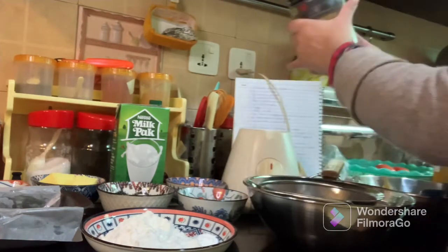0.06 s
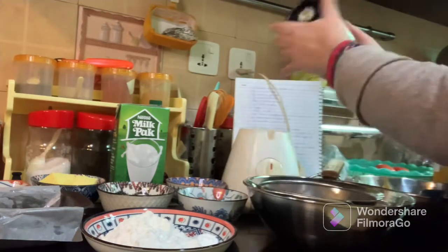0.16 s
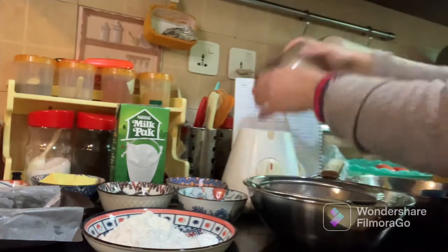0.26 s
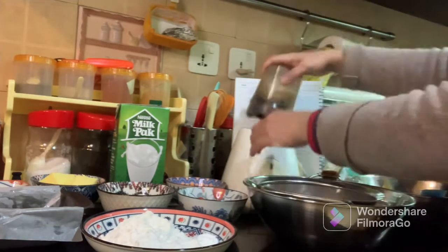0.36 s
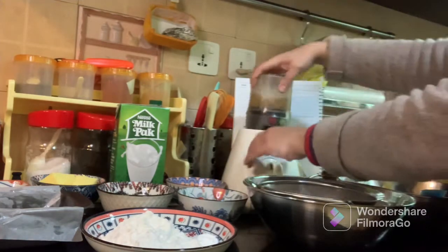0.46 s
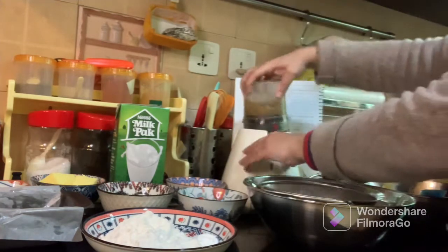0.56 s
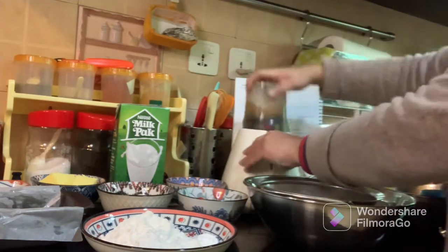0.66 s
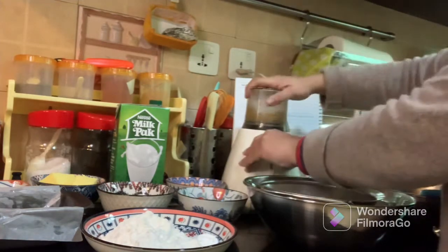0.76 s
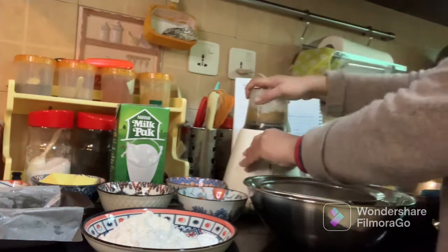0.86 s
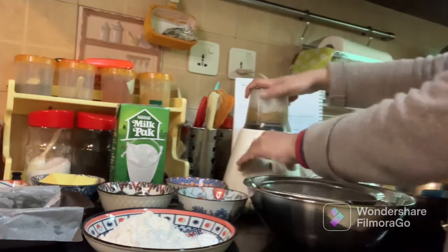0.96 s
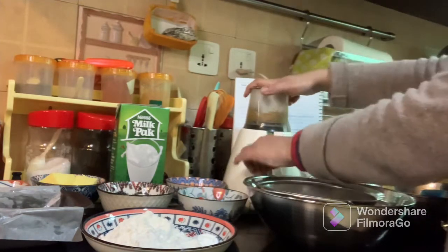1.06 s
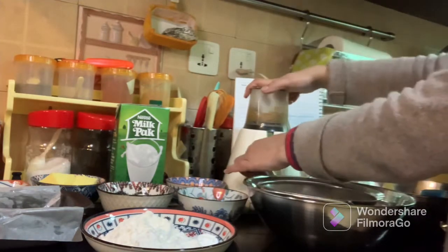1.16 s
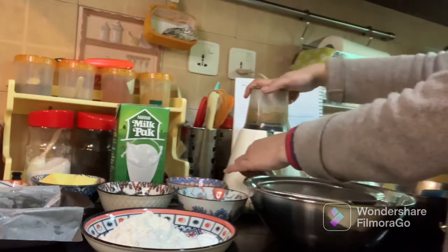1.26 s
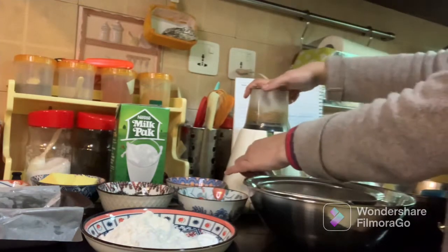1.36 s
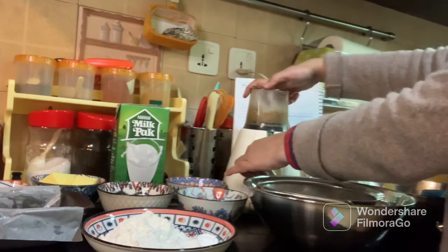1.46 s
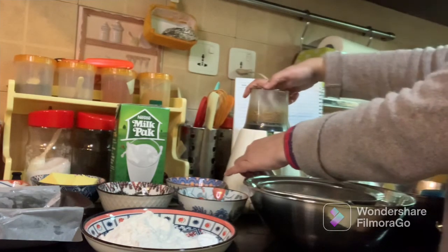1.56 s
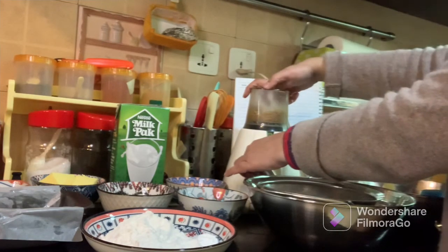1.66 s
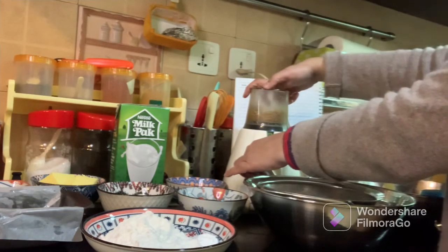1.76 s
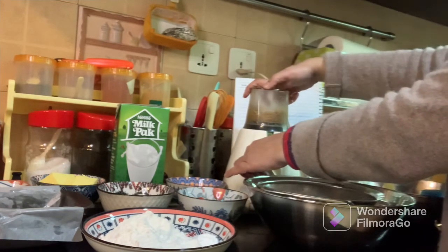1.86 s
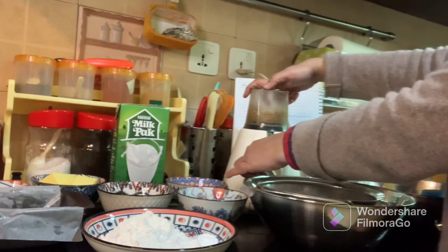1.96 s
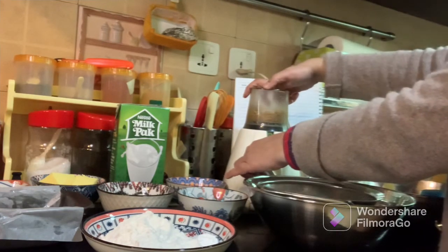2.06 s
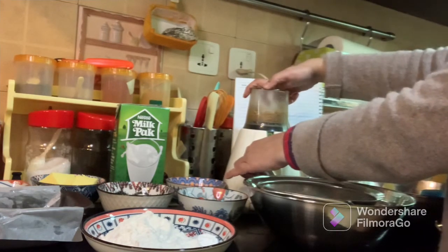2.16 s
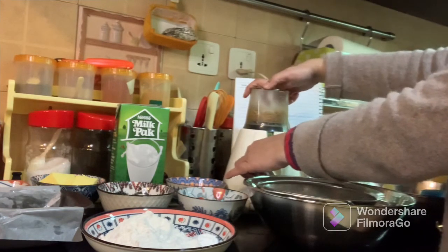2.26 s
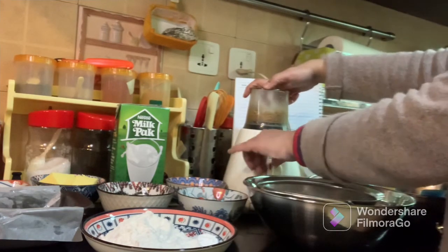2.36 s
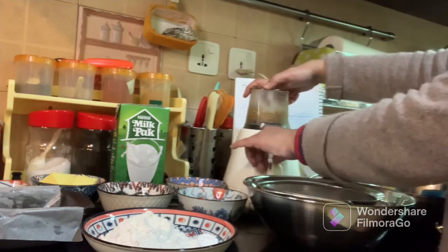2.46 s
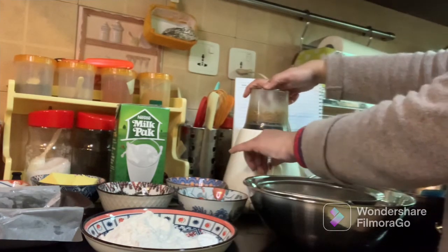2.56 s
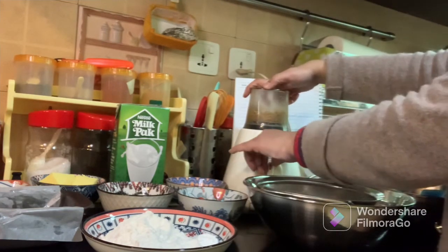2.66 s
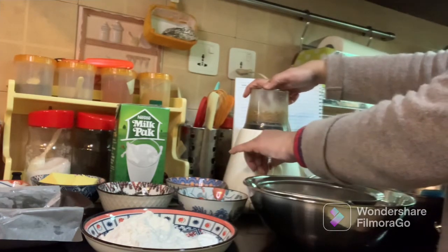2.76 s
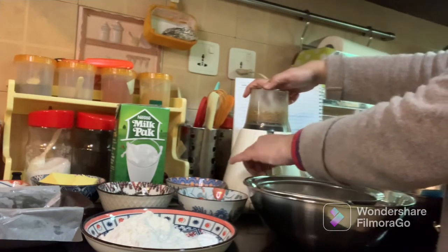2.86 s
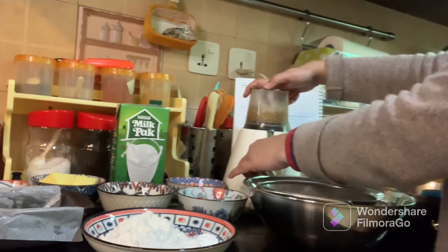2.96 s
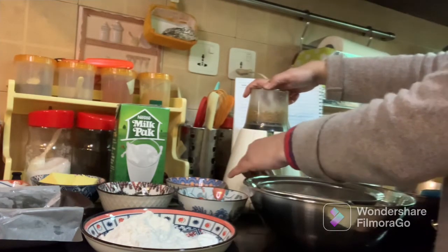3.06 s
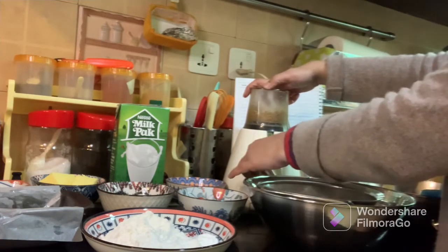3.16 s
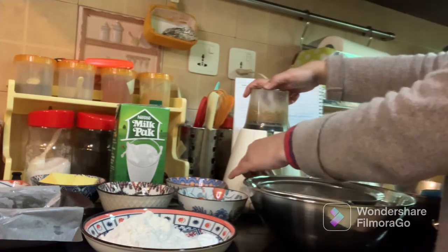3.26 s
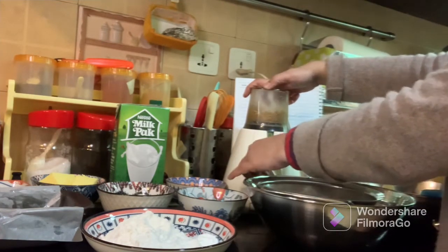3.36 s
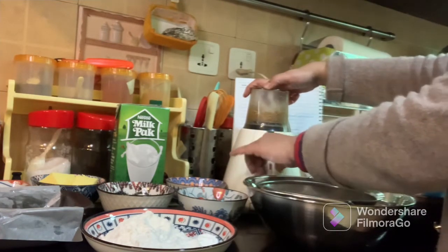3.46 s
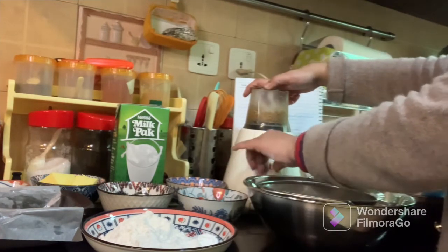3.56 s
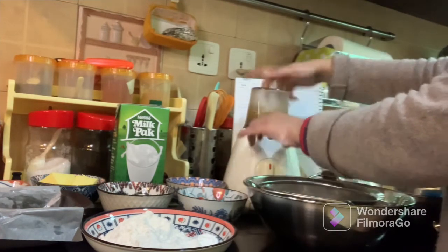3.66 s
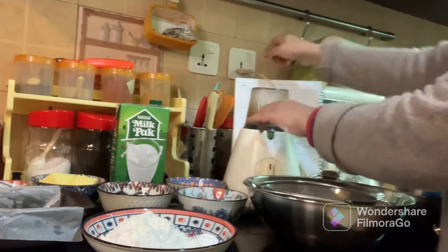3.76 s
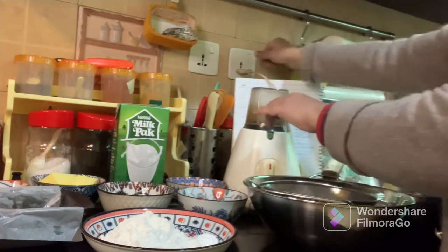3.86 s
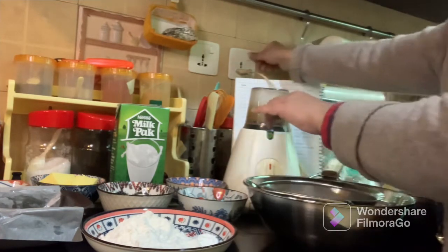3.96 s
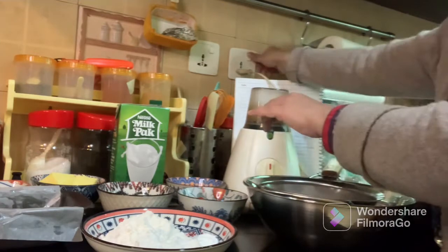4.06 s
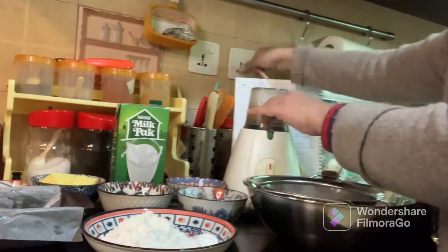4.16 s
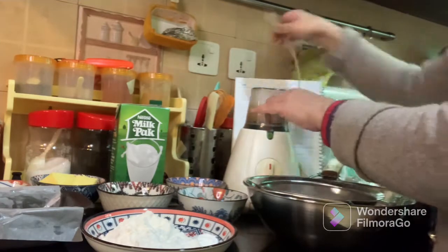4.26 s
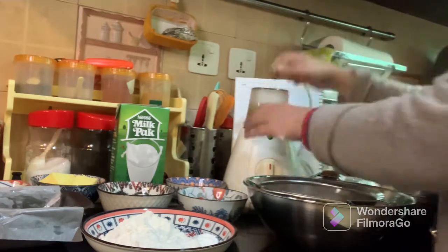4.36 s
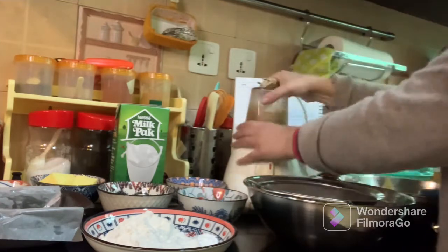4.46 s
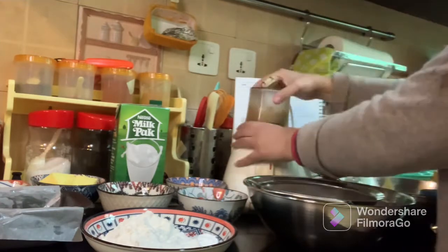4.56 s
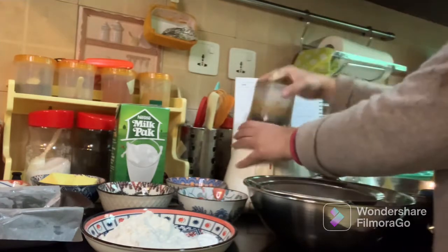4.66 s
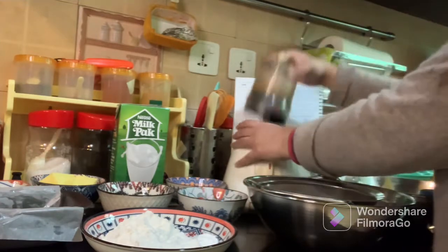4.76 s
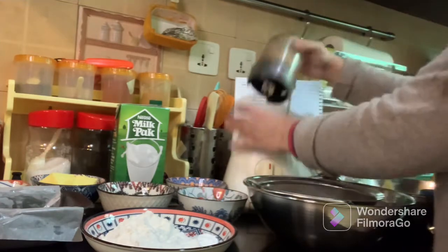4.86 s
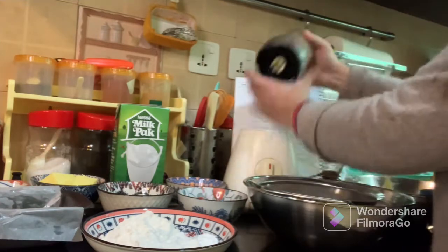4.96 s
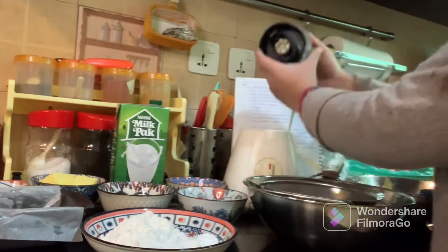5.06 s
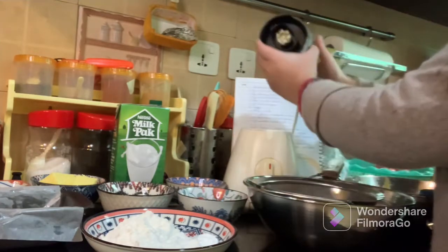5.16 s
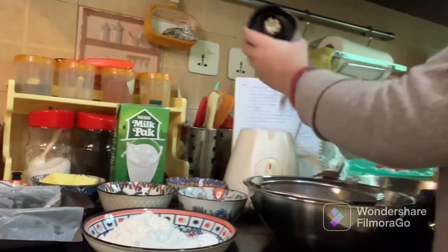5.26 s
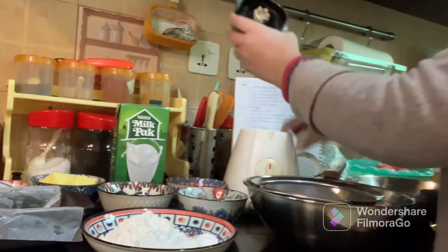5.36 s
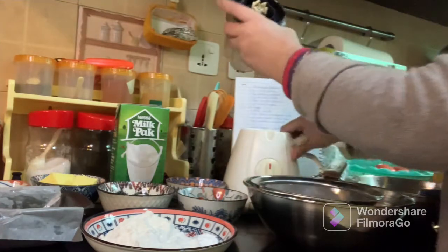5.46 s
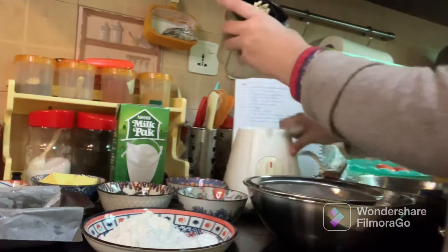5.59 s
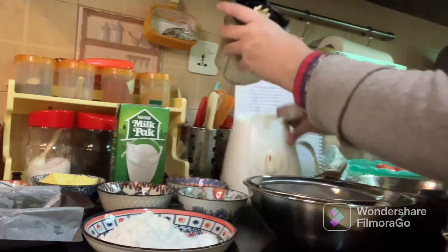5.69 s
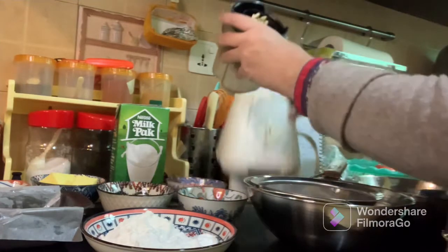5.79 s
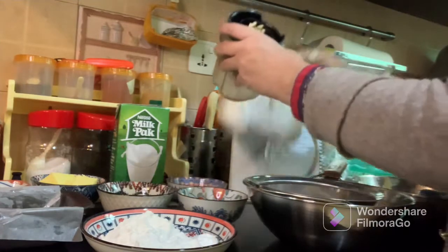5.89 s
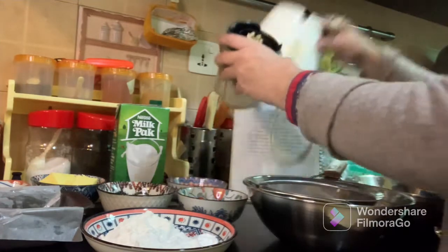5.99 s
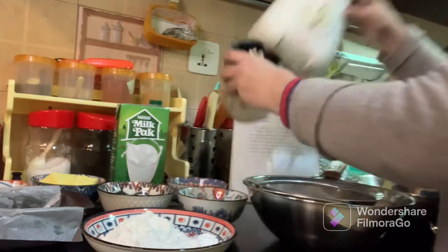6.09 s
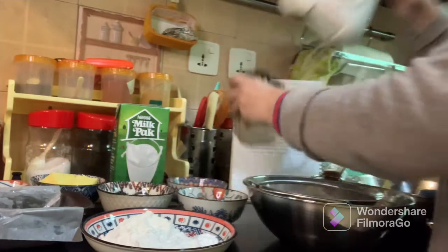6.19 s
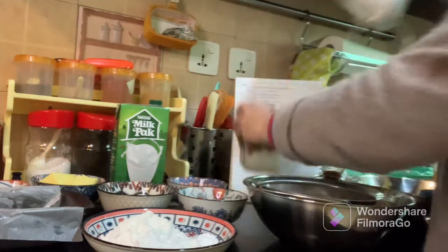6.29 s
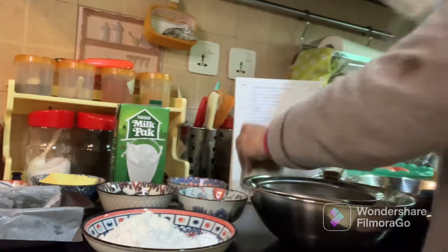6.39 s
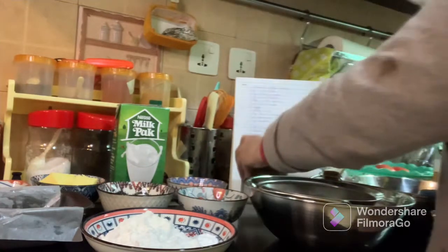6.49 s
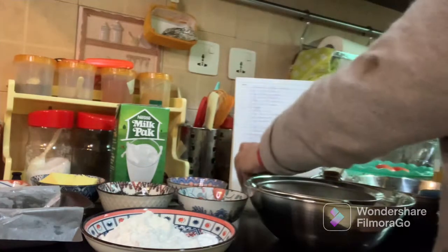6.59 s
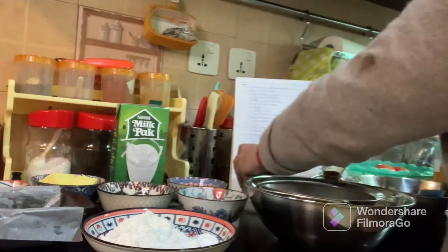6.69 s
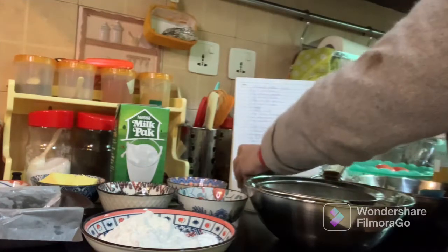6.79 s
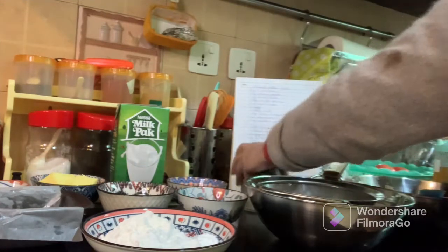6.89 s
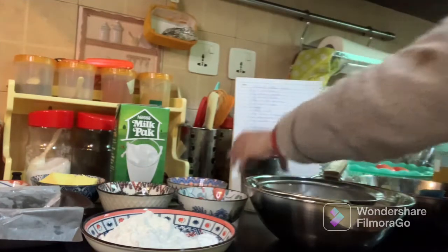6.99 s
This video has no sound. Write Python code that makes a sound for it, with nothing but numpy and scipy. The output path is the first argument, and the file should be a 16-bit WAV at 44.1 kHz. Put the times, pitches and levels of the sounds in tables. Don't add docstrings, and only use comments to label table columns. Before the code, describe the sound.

In a tiled kitchen, plastic is knocked into place, a nut grinder whirs twice and winds down, then clicks, clatter and a hard bang follow.

```python
import sys
import numpy as np
from scipy import signal
from scipy.fft import rfft, irfft, next_fast_len
from scipy.io import wavfile
from scipy.ndimage import uniform_filter1d

SR = 44100
rng = np.random.default_rng(int(sys.argv[2]) if len(sys.argv) > 2 else 0)


def elevation(decibels):
    levels = np.asarray(decibels, float)
    return 10 ** (levels / 20)


def to_wav(s):
    ch = np.atleast_2d(s).T
    pcm = np.round(np.clip(ch, -1, 1) * 32767)
    wavfile.write(sys.argv[1], SR, pcm.astype(np.int16))


N = 310002
TIME = np.arange(N) / SR
CUT_S = 4.68


def colour(x, table):
    hz, db = np.transpose(table)
    f = np.log(np.fft.rfftfreq(x.shape[-1], 1 / SR) + 1)
    y = irfft(rfft(x) * elevation(np.interp(f, np.log(hz), db, left=-90, right=-90)), x.shape[-1])
    return y / np.sqrt(np.mean(y ** 2))


def curves(rows):
    s, *columns = np.transpose(rows)
    return [np.interp(TIME, s, c) for c in columns]


def walk(rate):
    k = int(SR / rate)
    held = np.repeat(rng.standard_normal(N // k + 1), k)
    return 1.27 * uniform_filter1d(held, k)[:N]


def bumps(rows):
    return sum(size * np.exp(-((TIME - s) / np.where(TIME < s, length[0], length[-1])) ** 2)
               for s, size, *length in rows)


def pair(likeness, size=N):
    mid, side = rng.standard_normal((2, size))
    c = np.clip(likeness, 0, 1)
    return (np.sqrt(1 + c) * mid + np.sqrt(1 - c) * side * np.array([[1], [-1]])) / np.sqrt(2)


def ring(modes, t):
    turn = rng.standard_normal((len(modes), 2))
    return sum(elevation(db - 60 * t / max(t60, .005)) * np.sin(2 * np.pi * hz * t + 0.69 * p[:, None])
               for (hz, db, t60), p in zip(modes, turn))


def add(out, s, piece, db):
    i = max(int(s * SR), 0)
    piece = piece[:, i - int(s * SR):]
    out[:, i:i + piece.shape[1]] += (elevation(db) * piece / np.abs(piece).max())[:, :N - i]


def lag_left(x, lag_s):
    turn = np.exp(-2j * np.pi * np.fft.rfftfreq(N, 1 / SR) * lag_s)
    return np.array([irfft(rfft(x[0]) * turn, N), x[1]])


def room(x, t60, wet_db, treble_db):
    t = np.arange(SR // 2) / SR
    noise = pair(0.017, size=SR // 2)
    dull = signal.lfilter(*signal.butter(1, 2500, fs=SR), noise)
    tail = dull * elevation(-60 * t / t60) + (noise - dull) * elevation(treble_db - 60 * t / (0.63 * t60))
    tail = tail * (1 - np.exp(-t / 0.0045)) / np.sqrt(SR * t60 / 40)
    wet = x + elevation(wet_db) * signal.fftconvolve(x.mean(0, keepdims=True), tail, axes=1)[:, :N]
    return signal.lfilter(*signal.butter(2, 140., "high", fs=SR), wet)


# frequency in Hz, level in dB per Hz.
HUM = [(15, -58), (25, -12.5), (75, 0), (177, -6), (211, -3.5), (233, -12.5), (500, -20.5), (700, -70)]
# frequency in Hz, level in dB per Hz.
RUSTLE = [(150, -63.5), (250, -16.5), (355, -10.5), (430, -18.5), (1170, -21), (2320, -24), (6180, -32.5),
          (16000, -56)]
# time in s, rustle in dB, top octave in dB, hum gain in dB, length in s.
SWISHES = [(0, -67, -90, 0.5, 0.096), (0.497, -68, -93, 6, 0.064), (0.811, -45, -87, 0, 0.047),
           (0.978, -53.5, -84, 2, 0.089), (3.084, -51, -58, -2, 0.077), (4.42, -60.5, -69, -0.5, 0.13),
           (4.621, -44.5, -72, 3, 0.047), (4.81, -49.5, -60, -1.5, 0.15), (5.07, -62.5, -65, 2, 0.075),
           (5.495, -56, -77, -2, 0.2), (5.938, -46.5, -56.5, 5.5, 0.13), (6.28, -59, -70, -3, 0.13),
           (6.751, -39, -62, 1.5, 0.084), (6.91, -60.5, -72, 1, 0.087)]


def kitchen():
    later = (TIME > CUT_S).astype(int)
    s, rustle_db, fizz_db, hum_db, length = np.transpose(SWISHES)
    rustle = elevation(np.array((-73.5, -64.5))[later]) + bumps(zip(s, elevation(rustle_db), length))
    top = elevation(np.array((-108, -96))[later]) + bumps(zip(s, elevation(fizz_db), length))
    tone_db = np.array((-65, -56))[later] + bumps(zip(s, hum_db, length))
    hum = colour(pair(0.68), HUM) * elevation(tone_db + 2.7 * walk(7.8))
    fizz = colour(pair(0.55), [(10000, -36), (10800, -6.5), (15800, -2)]) * top * elevation(-7.5)
    return hum + fizz + colour(pair(0.039), RUSTLE) * rustle * elevation(0.57 * walk(24))


# time in s, peak in dB.
THUDS = [(0.453, -60), (0.486, -36.5), (0.629, -44), (0.765, -24.5), (.798, -27), (.92, -41.5),
         (4.468, -44), (4.64, -45), (4.76, -37.5), (4.80, -25.5), (4.836, -30), (4.886, -38), (5.495, -39),
         (5.531, -37), (5.58, -43)]
# mode in Hz, level in dB, 60 dB decay in s.
COUNTER_MODES = [(318, 0, .22), (290, -2, .14), (355, -6, .09), (245, -4, .08), (175, -6, .08)]


def thuds():
    out, t = np.zeros((2, N)), np.arange(SR // 4) / SR
    for s, db in THUDS:
        add(out, s, ring(COUNTER_MODES, t) * (1 - np.exp(-(t / 0.0054) ** 2)), db)
    return out


# frequency in Hz, level in dB per Hz.
PLASTIC = [(100, 10.5), (400, 3), (1000, 6), (2500, -4), (5000, -17), (16000, -30.5)]
# frequency in Hz, level in dB per Hz.
CRACK = [(1500, -2), (3500, 6.5), (6500, -3.5), (10000, -7.5), (15500, -9.5), (16500, -26)]


def knocks(table, rise):
    out, t = np.zeros((2, N)), np.arange(2 ** 13) / SR
    for s, db, hz, crack_db, contact in table:
        late = t - 2 * rise
        push = np.where(late < 0, np.exp(-(late / rise) ** 2), np.exp(-late / max(contact, .001)))
        shake = push[None] * rng.standard_normal((1, len(t)))
        hollow = ring([(hz, 0, .02), (hz * 1.15, -4, .012), (hz * .8, -4, .012)], t[:2048])
        rung = signal.fftconvolve(shake, hollow, axes=1)[:, :len(t)]
        scuff = colour(pair(0.16, size=len(t)), PLASTIC)
        scuff = scuff + elevation(crack_db + 13.0) * colour(pair(0.32, size=len(t)), CRACK)
        add(out, s - 1.4 * rise, rung / np.abs(rung).max() + 0.41 * scuff * push, db)
    return out


# time in s, peak
# in dB, ring in Hz, crack in dB, contact in s.
FAST_KNOCKS = [(0.03, -53, 1950, -4, 0.012), (0.456, -35.5, 447, -19, 0.017), (0.507, -42, 452, -42, 0.017),
               (0.584, -47, 636, -29, 0.048), (0.629, -49, 810, -33, 0.029), (0.698, -49, 678, -19, 0.018),
               (0.769, -16.5, 310, -22.5, 0.013), (0.92, -18.5, 1440, -12, 0.016),
               (1.18, -44, 2000, -4.5, 0.01), (3.839, -28, 960, 4, 0.018), (4.082, -28, 680, -16, 0.038),
               (4.474, -27.5, 1980, -11, 0.022), (4.56, -26, 790, -6, 0.018),
               (4.62, -28.5, 970, -24, 0.013), (4.766, -23, 645, -24.5, 0.015),
               (4.814, -33.5, 420, -17, 0.045)]


def fast_hands():
    return knocks(FAST_KNOCKS, rise=.011)


# time in s, peak in dB, ring in Hz, crack in dB, contact in s.
KNOCKS = [
    (4.795, -25.5, 2090, -6, 0.003),
    (4.998, -39.5, 970, -14, 0.0091),
    (5.158, -43, 2520, -10, 0.005),
    (5.315, -34.5, 1320, -23, 0.009),
    (5.476, -38.5, 790, -7.5, 0.0073),
    (5.494, -24, 1100, -20.5, 0.0079),
]


def hands():
    return knocks(KNOCKS, rise=0.0015)


# frequency in Hz, level in dB per Hz.
CLATTER = [(300, -5), (800, 6), (1400, 5), (2500, 1.5), (4200, -10), (6500, -40), (16000, -55)]


def struck(table, modes, contact, chatter_db, rattle_db, rattle_s):
    out, t = np.zeros((2, N)), np.arange(3 * 2 ** 12) / SR
    rise = 1 - np.exp(-(t / contact) ** 2)
    for s, db, crack_db in table:
        twins = [(hz * (1 + .035 * rng.uniform(-1, 1)), d - 3, t60) for hz, d, t60 in modes]
        body = ring(modes + twins, t) * rise
        chatter = rng.standard_normal((1, len(t))) * np.exp(-t / rattle_s) / np.sqrt(SR * rattle_s)
        body = body + elevation(chatter_db) * signal.fftconvolve(chatter, body, axes=1)[:, :len(t)]
        crack = colour(pair(0.31, size=len(t)), CRACK) * (np.exp(-t / 0.003) + 0.17 * np.exp(-t / rattle_s))
        rattle = colour(pair(0.36, size=len(t)), CLATTER) * np.exp(-t / rattle_s)
        noise = elevation(crack_db) * crack + elevation(rattle_db) * rattle
        add(out, s - contact, body / np.abs(body).max() + rise * noise, db)
    return out


# time in s, peak in dB, crack in dB.
LATCH = [
    (5.235, -23, -11),
    (5.2594, -31, -23),
]
# mode in Hz, level in dB, 60 dB decay in s.
LATCH_MODES = [(1950, -5, .06), (2600, -9, .02), (3100, -9, .015), (3650, -2, .028), (3950, -3, .02),
               (4450, -2, .03), (4750, -3, .02), (5200, -6, .015), (5700, -6, .02), (6300, -3, .02)]


def latch():
    return struck(LATCH, LATCH_MODES, 0.0025, chatter_db=3.1, rattle_db=-31, rattle_s=0.013)


# time in s, peak in dB, crack in dB.
BOWL = [
    (5.807, -34, -45),
    (5.84, -33.5, -45),
    (5.886, -48, -32),
    (5.912, -36, -44),
    (5.95, -39, -43),
]
# mode in Hz, level in dB, 60 dB decay in s.
BOWL_MODES = [(1676, -4, 0.85), (3460, -5.5, 0.59), (5960, 3, 0.06), (6100, -3, .04)]
# time in s, peak in dB, crack in dB.
CLINK = [
    (6.484, -24.5, -33),
]
# mode in Hz, level in dB, 60 dB decay in s.
CLINK_MODES = [(1440, -6, 0.036), (1760, 0, 0.068), (1950, 10, 0.075), (2090, -1, 0.09), (3740, -18, 0.085)]


def bowls():
    nudged = struck(BOWL, BOWL_MODES, 0.0064, chatter_db=-12.0, rattle_db=-26.0, rattle_s=0.017)
    return nudged + struck(CLINK, CLINK_MODES, 0.0014, chatter_db=-15, rattle_db=-26.0, rattle_s=0.0144)


# time in s, peak in dB, crack in dB.
SET_DOWN = [
    (5.807, -8.5, -15.5),
    (5.839, -22, -9),
]
# mode in Hz, level in dB, 60 dB decay in s.
SET_DOWN_MODES = [(165, -19, .7), (384, -2, .09), (683, -10, .04), (850, -1, .035), (1495, 0, .11),
                  (3950, -20, .03)]


def set_down():
    return struck(SET_DOWN, SET_DOWN_MODES, 0.002, chatter_db=-6, rattle_db=-11.5, rattle_s=0.017)


# time in s, peak in dB, middle mode in dB, crack in dB.
BOUNCES = [(5.8702, -18, 7, -29), (5.874, -1, 0, -23.5), (5.882, -9, 0, -28), (5.891, -13, 0, -30),
           (5.9217, -6.5, -13, -28), (5.9601, -12, -4, -28), (5.9685, -17, 0, -30),
           (5.9846, -10, -1, -19.5), (5.994, -17.5, 1, -32), (6.026, -20, 0, -32), (6.05, -22, 2, -30),
           (6.095, -28.5, 1, -31), (6.129, -31, 0, -32)]
# mode in Hz, level in dB, 60 dB decay in s.
BOUNCE_MODES = [(1384, 1, .035), (1260, -2, .045), (1491, -2, .045), (1130, -12, .02), (1717, -9, .025),
                (2040, -13, .025), (2300, -16, .02), (2750, -19, .015)]


def bounces():
    out, t = np.zeros((2, N)), np.arange(2 ** 13) / SR
    rise = 1 - np.exp(-(t / .0012) ** 2)
    for s, db, middle_db, crack_db in BOUNCES:
        sink = 1 - .3 * max(s - 5.93, 0)
        lift = [middle_db] + [0] * (len(BOUNCE_MODES) - 1)
        body = sum(elevation(d + up - 60 * t / max(t60, .005)) * np.sin(2 * np.pi * hz * sink * (t - .001))
                   for (hz, d, t60), up in zip(BOUNCE_MODES, lift))
        crack = elevation(crack_db) * colour(pair(0.46, size=len(t)), CRACK) * np.exp(-t / 0.0017)
        rattle = elevation(-19.5) * colour(pair(0.33, size=len(t)), CLATTER) * np.exp(-t / 0.019)
        add(out, s - .0005, (body / np.abs(body).max() + crack + rattle) * rise, db)
    return out


# time in s, peak in dB, crack in dB.
BANG = [
    (6.655, -8, -6),
]
# mode in Hz, level in dB, 60 dB decay in s.
BANG_MODES = [(156, -13, .25), (400, -6, .1), (479, -6, .12), (545, -3, .14), (624, 0, .14), (678, -3, .1),
              (800, -5, .06), (1098, -12, .1), (1890, -9, .12), (2665, -16, .06), (3870, -19, .04),
              (4404, -17, .06), (5600, -12, .09), (5780, -15, .05)]


def bang():
    return struck(BANG, BANG_MODES, .0008, chatter_db=-1.1, rattle_db=-16.0, rattle_s=0.028)


# time in s, peak in dB, length in s.
SWITCH = (4.089, -19, 0.0096)
# frequency in Hz, level in dB per Hz.
SNAP = [(1500, -14), (3000, -1), (5300, 4.5), (7000, -2), (11000, -2.5), (15600, -2.5), (16500, -25)]


def switch():
    out, t = np.zeros((2, N)), np.arange(-.05, .05, 1 / SR)
    s, db, length = SWITCH
    add(out, s + t[0], colour(pair(0.33, size=len(t)), SNAP) * np.exp(-(t / length) ** 2), db)
    return out


# time in s, rms in dB, pitch in Hz, length in s.
SQUEALS = [(1.36, -23.5, 2240, 0.023), (1.581, -30, 620, 0.034), (3.26, -33, 750, .02),
           (3.9, -38, 690, .05), (1.797, -24.5, 1152, 0.014), (2.2, -32, 1030, 0.014),
           (1.9, -38, 1420, 0.045), (2.172, -38, 2100, 0.024), (3.248, -30, 2050, 0.021),
           (3.28, -36, 1410, 0.036), (3.417, -37, 990, 0.02), (4.489, -33.5, 1960, 0.012),
           (0.99, -44.5, 1100, 0.022), (0.028, -63, 1910, 0.025), (0.037, -71, 3660, 0.046),
           (0.017, -67, 4000, 0.027)]
# time in s, rms in dB, pitch in Hz, length in s.
HOLLOWS = [(.095, -77, 4750, .02), (.21, -79, 4700, 0.019), (.315, -80, 4700, 0.017),
           (.42, -78, 4700, .012), (.11, -75, 3600, .015), (.772, -35, 662, 0.012), (.775, -39, 990, .014),
           (.775, -46, 1420, .014), (.777, -43, 2340, 0.014), (.776, -50, 2800, .014),
           (.932, -34.5, 1390, 0.011), (.93, -36.5, 2160, 0.011), (.95, -39.5, 1000, .016),
           (.93, -41, 2000, .012), (3.85, -35, 4100, .014), (3.845, -38, 3000, .014),
           (3.848, -40, 2200, .012), (3.855, -44, 4600, .014), (3.89, -42, 4600, .012),
           (3.885, -40, 920, .014), (4, -43, 2000, .03), (4.33, -61, 2900, .025), (4.41, -61, 1040, .02),
           (4, -36, 1920, 0.011), (4.53, -47, 1930, .035), (4.48, -44, 2300, .012), (4.48, -46, 3120, .012),
           (4.48, -45, 3660, .014), (4.63, -44, 2100, 0.014), (4.33, -63, 1800, .02),
           (4.57, -44, 800, .014), (4.655, -44, 400, .014), (4.772, -40, 650, .01), (4.775, -47, 2200, .01),
           (4.797, -46, 3000, .005), (5.16, -59, 2400, .004), (5.16, -61, 3700, .004),
           (5.195, -60, 2500, .008), (5.53, -56, 2400, .04)]


def squeals():
    out, t = np.zeros((2, N)), np.arange(-.12, .12, 1 / SR)
    for table, width_hz in ((SQUEALS, 130), (HOLLOWS, 380)):
        for s, db, hz, length in table:
            band = signal.iirpeak(hz, hz / width_hz, SR)
            tone = signal.lfilter(*band, signal.lfilter(*band, pair(0.18, size=len(t))))
            add(out, s + t[0], tone * np.exp(-(t / length) ** 2), db + 10)
    return out


# on in s, off in s, level in dB, sag in dB per s as the pieces get finer.
BURSTS = [
    (1.207, 2.963, -27.5, 5.5),
    (3.151, 4.114, -26.5, 14),
]
# time in s, gain in dB, rise in s, fall in s.
LUMPS = [
    (1.35, 4.5, 0.068, 0.015),
    (1.55, 5.5, 0.11, 0.029),
    (1.82, 8, 0.13, 0.17),
    (2.18, 5.5, 0.089, 0.14),
    (2.6, 2, 0.023, 0.019),
    (2.77, 7.5, 0.063, 0.03),
    (3.26, 4.5, 0.014, 0.0087),
    (3.56, 1, 0.22, 0.072),
    (3.838, 8, 0.0057, 0.055),
    (3.95, 3.5, 0.062, 0.065),
]


def load():
    spin_up_s, release_db_per_s = 0.044, 200
    gain, treble_db, lumps_db = 1e-4, 0, bumps(LUMPS)
    for on, off, db, sag in BURSTS:
        since, after = np.maximum(TIME - on, 0), np.maximum(TIME - off, 0)
        spin_up = 1 - np.exp(-(since / spin_up_s) ** 1.04)
        gain = gain + spin_up * elevation(db - sag * since - release_db_per_s * after + lumps_db)
        dull_db = -8.5 * np.exp(-since / 0.088) - 55 * after * (after < .16)
        treble_db = treble_db + (since > 0) * dull_db
    return 20 * np.log10(gain), treble_db - 0.3 * lumps_db


# time in s, speed in Hz.
SHAFT = [
    [(1.25, 125.1), (1.31, 163), (1.49, 242.2), (1.7, 277), (1.98, 260.1), (2.13, 297.3), (2.4, 295.2),
     (2.5, 247.7), (2.9, 139.5)],
    [(3.2, 146.8), (3.34, 235.4), (3.48, 284.3), (3.55, 246.8), (3.72, 202.9), (3.9, 146.5)],
]
# time in s, gain in dB, length in s.
SHUDDERS = [(1.49, 9, 0.067), (1.9, 7.5, 0.066), (2.03, -10, 0.042), (1.59, -12, .02), (2.22, 5.5, 0.036),
            (2.48, -11, 0.028), (2.555, 10, 0.026), (3.57, -24, 0.057), (3.72, 10, 0.075), (2.85, -10, .1),
            (3.27, 6, .03), (3.46, -5, .04), (3.9, -15, .07), (2.31, -6, .02)]
# time in s, gain in dB, length in s.
KNOCKING = [
    (1.31, 3.5, 0.044),
    (1.88, 7.5, 0.15),
    (2.25, 3, 0.26),
    (3.4, 0, 0.076),
    (3.75, -9, .2),
    (2.7, -5, .2),
]
OVERTONES_DB = [-6, -0.5, 1, -8, -16, -17, -17, -9.5, -8, -4]


def motor(level_db):
    out = np.zeros((2, N))
    for rows in SHAFT:
        span = slice(int((rows[0][0] - .05) * SR), int((rows[-1][0] + 0.047) * SR))
        hz = curves(rows)[0][span]
        hum_db = -43 + 16 * np.log2(hz / 280) + bumps(SHUDDERS)[span]
        knock_db = (level_db + bumps(KNOCKING))[span] - 17.5
        phase = 2 * np.pi * np.cumsum(hz * (1 + 0.009 * walk(40)[span])) / SR
        lag = rng.uniform(0, 1, (len(OVERTONES_DB), 2, 1))
        knock = sum(elevation(db + 2.3 * walk(18)[span]) * np.sin((k + 2) * phase + 2.86 * lag[k])
                    for k, db in enumerate(OVERTONES_DB))
        hum = elevation(hum_db + 4.5 * walk(32)[span]) * np.sin(phase + np.array([[0], [1.3]]))
        fade = signal.windows.tukey(len(hz), .1)
        out[:, span] = fade * np.sqrt(2) * (hum + elevation(knock_db) * knock)
    return out


def streak(x):
    frames = signal.stft(x, SR, nperseg=1024, noverlap=768)[2]
    ripple = uniform_filter1d(rng.standard_normal(frames.shape[1:]), size=8, axis=1)
    ripple = uniform_filter1d(ripple, size=2, axis=0)
    shifted = frames * elevation(2.5 * ripple / ripple.std())
    y = signal.istft(shifted, SR, nperseg=1024, noverlap=768)[1][:, :N]
    return y * x.std() / y.std()


# frequency in Hz, level in dB per Hz.
JAR = [(35, -58), (60, -31), (119, -20), (258, -6), (1080, -5.5), (2200, -3.5), (4640, -12.5), (16000, -35)]
# frequency in Hz, width in Hz, level in dB.
JAR_RINGS = [(672, 29.4, -2), (795, 60, -5.5), (1103, 150, 0), (1433, 20, -1), (2020, 78, -2.5),
             (2280, 77, -9.5), (3175, 62, -10.5), (3496, 210, -6), (4200, 73, -5), (4610, 59, 0.5)]


def nuts(level_db, bright_db):
    thrum_db = np.minimum(-0.88 * (level_db - BURSTS[0][2]), 16)
    strikes = elevation(1.4 * rng.exponential(size=N)) * (rng.random(N) < .25)
    hits = pair(0.095) * np.sqrt(np.abs(uniform_filter1d(strikes ** 2, size=40)))
    hits = hits + sum(elevation(db + 4.0 + 2.2 * walk(30)) * signal.lfilter(*signal.iirpeak(hz, hz / max(w, 40), SR), hits)
                      for hz, w, db in JAR_RINGS)
    size = next_fast_len(N)
    spectrum = rfft(streak(colour(hits, JAR)), size)
    f = np.log2(np.fft.rfftfreq(size, 1 / SR) + 1)
    surge_db = .8 * walk(22)
    out = 0
    for octave in np.arange(6.5, 14.1, .5):
        share = np.clip(1 - 2 * np.abs(f - octave), 0, 1)
        treble_tilt = np.clip((octave - 11.2) / 2.7, 0, 1) * (bright_db + 8.0)
        thrum_tilt = np.clip(9.2 - octave, 0, 1) * (thrum_db - 1.5)
        flicker_db = 1.3 * walk(20) + surge_db
        out = out + elevation(treble_tilt + thrum_tilt + flicker_db) * irfft(spectrum * share, size)[:, :N]
    on = (TIME > BURSTS[0][0]) & (TIME < BURSTS[-1][1] + .2)
    return out * on * elevation(level_db + np.array([[-.2], [1.3]]))


def scene():
    level_db, bright_db = load()
    chopper = motor(level_db) + nuts(level_db, bright_db) + squeals() + switch()
    chopper = room(lag_left(chopper, 7e-5), 0.28, -7.0, -0.85)
    seating = room(fast_hands() + thuds(), 0.33, -5.5, -3.0)
    blows = room(set_down() + bounces(), 0.54, -10, -.7)
    blows = blows + room(bowls() + hands() + latch(), 0.54, -5.0, -0.67)
    blows = blows + room(bang(), 0.61, -6.0, 0)
    handled = seating + blows * elevation(np.array([[-.8], [.8]]))
    return chopper + lag_left(handled, 0.00013) + kitchen()


GAP_FILLED_S = [4.089, 4.797, 5.238, 6.659]


def thin_treble(dry):
    f, s, frames = signal.stft(dry, SR, nperseg=512)
    later = s > CUT_S
    shift = 72
    frames[:, shift:] += elevation(-19.5) * frames[:, :-shift] * later * (f[:-shift, None] > 4500)
    f, block = f[:, None], (s * SR // 2048).astype(int)
    chance = rng.random((block.max() + 1, 70))
    missing = .35 * np.clip((f - 10500) / 3000, 0, 1) * (s < CUT_S)
    patches = chance[block][:, (f[:, 0] // 345).astype(int)].T < missing
    wider = 400 * ((s > 5.8) & (s < 6.12))
    bottom = 7530 - wider + 900 * (chance[block, 0] ** 2 - .3)
    top = 10560 + wider / 2 + 700 * (chance[block, 1] - .5)
    gap = later & (f > bottom) & (f < top)
    blows = sum(np.abs(s - hit) < .005 for hit in GAP_FILLED_S) > 0
    dropped = (patches | gap | (f > 15850)) & ~blows
    return signal.istft(frames * ~dropped, SR, nperseg=512)[1][:, :N]


def band_limit(x):
    return signal.sosfilt(signal.butter(12, 17020, fs=SR, output="sos"), x)


def record(dry):
    return band_limit(thin_treble(dry))


dry = scene()
out = record(dry)
to_wav(out)
```